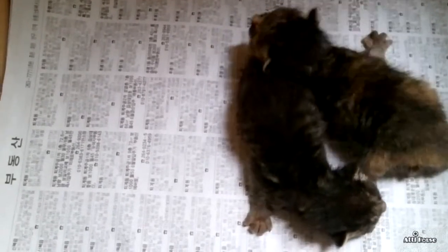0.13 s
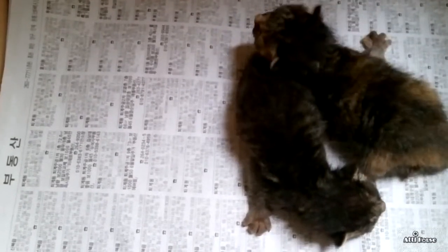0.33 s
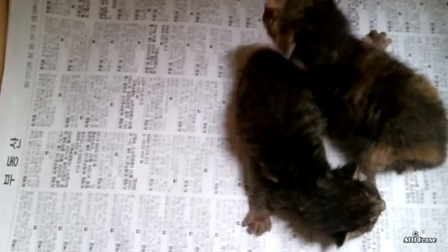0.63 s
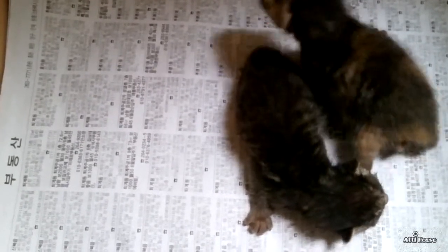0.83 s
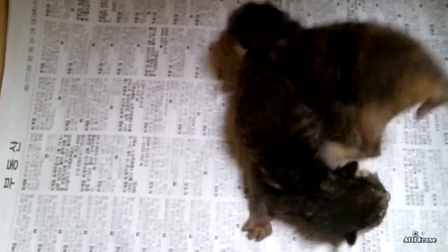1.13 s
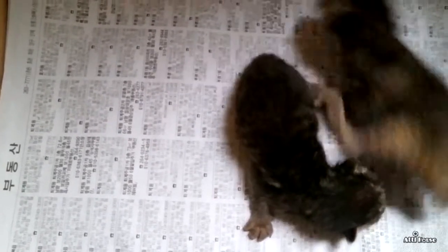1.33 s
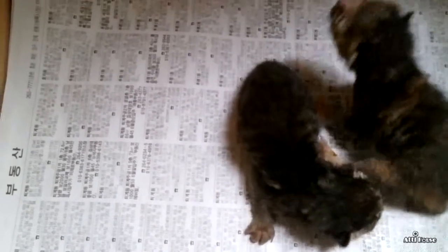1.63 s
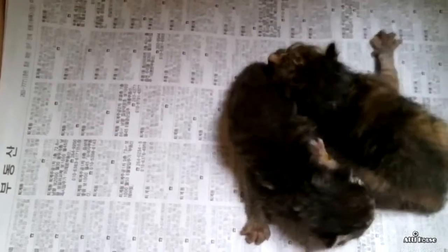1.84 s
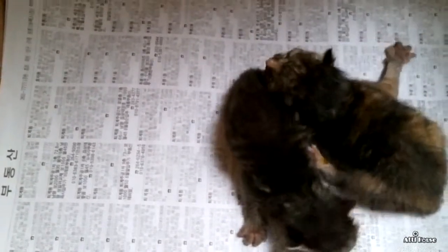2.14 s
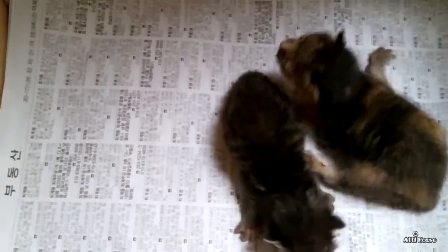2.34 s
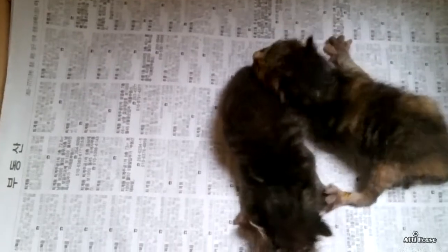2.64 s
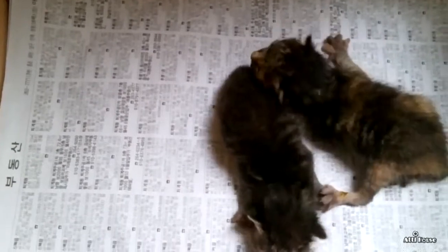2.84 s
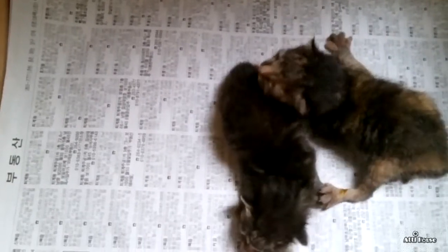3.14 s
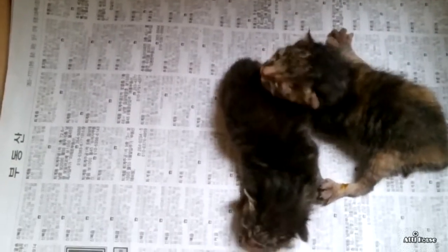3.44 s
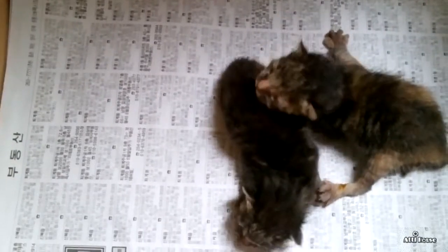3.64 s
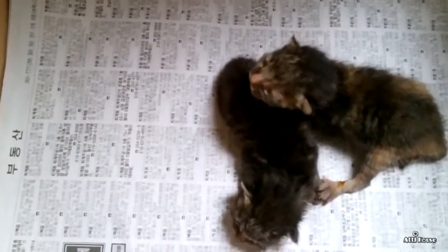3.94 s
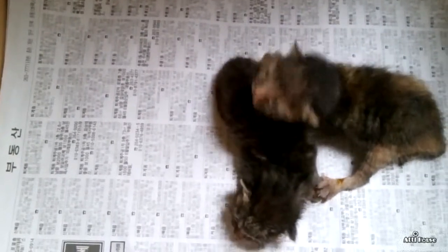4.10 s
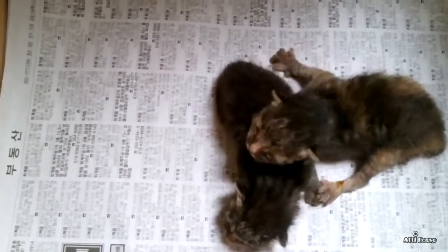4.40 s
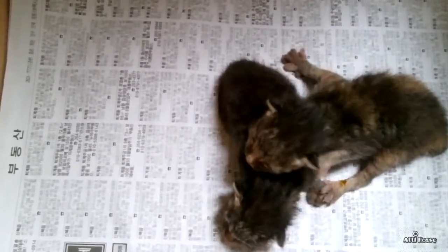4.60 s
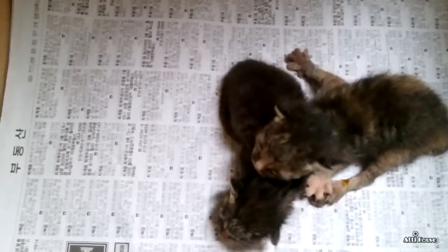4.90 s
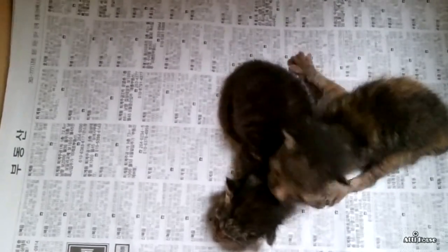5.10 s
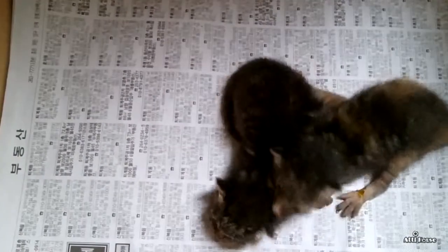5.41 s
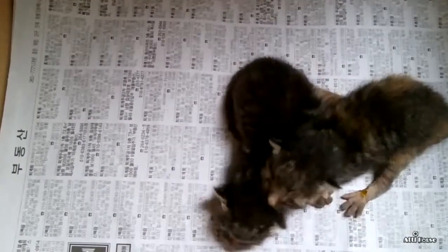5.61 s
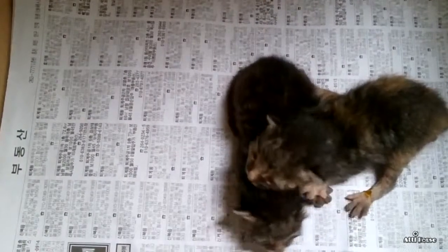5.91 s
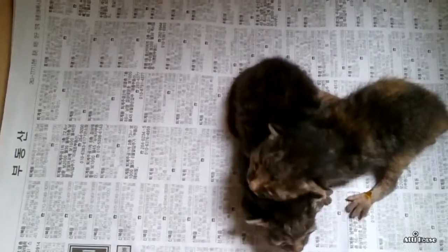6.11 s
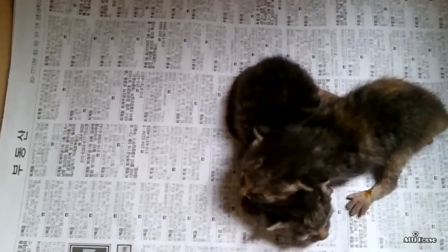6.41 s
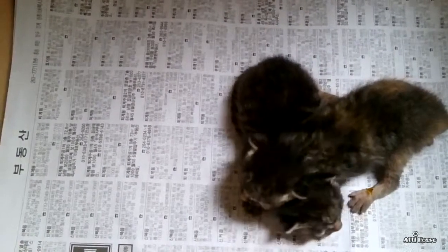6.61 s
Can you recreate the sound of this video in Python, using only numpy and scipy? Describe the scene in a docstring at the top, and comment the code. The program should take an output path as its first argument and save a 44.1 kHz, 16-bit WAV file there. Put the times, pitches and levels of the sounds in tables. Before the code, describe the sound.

Close, shrill kitten mews arch up and down, the loudest slightly distorted, with softer sibling cries, light paper pats and constant background hiss.

```python
"""A steady hiss, and almost at once a loud arching mew: a newborn kitten crawling on newspaper in a
small room, close to the microphone. It cries five times; a quieter littermate starts just ahead of two.
Each mew is a stack of gliding harmonics, shaped by a throat and a moving mouth, with air and roughness.
Paws pat and scuff the paper as short bursts of coloured noise. Short echoes and a tail make the room,
filtered noise makes the hiss and rumble, and the loudest cries overload the recorder."""
import sys
import numpy as np
from scipy import signal
from scipy.fft import rfft, irfft, next_fast_len
from scipy.io import wavfile
from scipy.ndimage import map_coordinates

SR = 44100
rng = np.random.default_rng(int(sys.argv[2]) if len(sys.argv) > 2 else 0)


def unload_wav(signal):
    """Save mono or channel-first audio to the path in sys.argv[1] as 16-bit WAV at rate SR, clipped to [-1, 1]."""
    wavfile.write(
        sys.argv[1],
        SR,
        np.round(np.clip(np.atleast_2d(signal).T, -1, 1) * 32767).astype(np.int16),
    )


N = 297675  # length of the scene in samples

# Steady colour of a kitten's voice: (frequency [Hz], relative level [dB])
THROAT_COLOUR = [(600.0, -31), (1200.0, -17), (1800.0, -5.5), (2400.0, -5.5), (3200.0, 0), (4200.0, -2),
                 (5200.0, -1.5), (5900.0, -7), (6600.0, -3.5), (7300.0, 0.5), (8300.0, -5.5), (9400.0, -14),
                 (10500.0, -22)]
# The arch of each cry, one list a cry, before its kitten's gain: (time [s], pitch [Hz], level [dB])
LOUD_ARCHES = [
    [(0.195, 712, -42), (0.228, 990, -19.5), (0.26, 1182, -13), (0.3, 1358, -11), (0.36, 1457, -11.5),
     (0.42, 1437, -11.5), (0.47, 1414, -14), (0.53, 1273, -13.5), (0.585, 1074, -16.5), (0.655, 657, -36.5)],
    [(1.23, 706.4, -38.5), (1.28, 1030, -15.5), (1.32, 1121, -7.5), (1.37, 1230, -8), (1.42, 1187, -11.2),
     (1.46, 1171, -5), (1.505, 1159, -10.5), (1.55, 1088, -18.5), (1.595, 935, -20), (1.665, 591, -32)],
    [(2.625, 719, -43), (2.675, 1004, -19), (2.73, 1230, -9.5), (2.785, 1387, -8), (2.85, 1358, -4.5),
     (2.9, 1275, -12.3), (2.955, 1108, -13.5), (3.005, 906, -18), (3.055, 668, -33.7)],
    [(3.9, 793.4, -29), (3.955, 1096, -11.5), (4.005, 1285, -10.5), (4.06, 1353, -9.5), (4.12, 1323, -9.5),
     (4.175, 1264, -9.5), (4.225, 1137, -16.5), (4.27, 906, -16.5), (4.335, 646, -37.5)],
    [(5.78, 712, -51), (5.825, 885, -28.5), (5.865, 979, -15.5), (5.91, 1113, -9), (5.96, 1156, -17.5),
     (6.005, 1184, -15.5), (6.05, 1117, -9.5), (6.11, 1018, -16.5), (6.165, 817, -20.1),
     (6.235, 630, -38.5)],
]
SOFT_ARCHES = [
    [(1.08, 628, -36), (1.115, 688, -26), (1.15, 821, -32.5), (1.187, 942, -20.5), (1.25, 1004, -14.5),
     (1.31, 980, -17), (1.37, 832, -25.5), (1.44, 594, -30)],
    [(3.755, 653, -43), (3.79, 927, -24.5), (3.83, 1063, -20), (3.9, 1221, -11.5), (3.95, 1202, -13.5),
     (4.005, 1188, -18.5), (4.06, 1068, -14), (4.13, 782, -27)],
]
# How each cry is mouthed: (mouth open by [share of the cry], resonance at the start [Hz],
# at the end [Hz], resonance height [dB], brightness with the mouth open [dB per octave],
# hoarseness [dB], detour of the bounce off the floor [m], off a nearby wall [m])
LOUD_MOUTHS = [(0.18, 6730, 3640, 11.5, -1.5, -14, 0.201, .848),
               (0.15, 5800, 3500, 18, -4.5, -16, 0.373, .744),
               (0.23, 5620, 3550, 20, -2.5, -27, 0.2976, 0.416),
               (0.17, 4860, 3730, 24.5, -1, -9, 0.3056, .556),
               (0.23, 4540, 3230, 25, -6.5, -14, 0.1376, 0.541)]
SOFT_MOUTHS = [(0.29, 2730, 2470, 23, -7.5, -30, 0.19, 0.572), (.19, 2620, 3390, 24.7, -3, -30, 0.359, 1.2)]
# The voice holds back (the first time it swells instead), then catches abruptly:
# (time of the catch [s], level change just before it [dB], time constant of the build-up [s])
CATCHES = [(1.179, 3, .014), (2.667, -5, 0.018), (3.83, -4, .015), (3.89, -12, 0.024)]
# The littermate wheezes around the start of its voice: (centre [s], level [dB], bell width [s])
WHEEZES = [(1.073, -34.5, .028), (3.755, -31.5, 0.018)]
# Paws patting the paper: (time [s], strength before later gains [dB], pitch [Hz])
PATS = [(0.732, -44, 1820), (0.809, -16, 1478), (0.937, -18.5, 2450), (1.498, -12, 2160),
        (1.77, -16.5, 1820), (2.066, -19.5, 2420)]
# Claws and fur scuffing the paper: (centre [s], level before the paw gain [dB], bell width [s])
SCUFFS = [(0.885, -34.5, 0.01), (2.092, -39.5, 0.038), (2.59, -37.5, 0.21), (4.772, -36, 0.0058),
          (6.695, -35, 0.0088)]
# Colour of the scuffed paper: (frequency [Hz], relative level [dB])
PAPER_COLOUR = [(300, -19), (1200, -6), (3800, -4), (7500, -5.5), (10000, -23)]
# Separate echoes off the walls: (delay [s], level [dB])
WALL_ECHOES = [(.0087, -11.5), (.0137, -22), (0.02, -26.5), (.029, -17)]
# How long the room's tail takes to fall by 60 dB: (frequency [Hz], time [s])
ROOM_DECAY = [(300, 1), (3500, 0.51), (10000, 0.33)]
# Colour of the background hiss and rumble: (frequency [Hz], relative level [dB])
BACKGROUND_COLOUR = [(13, -50), (22, 2), (45, 0), (110, -13.5), (139, -6.5), (166, -6), (232, -6),
                     (368, -14.5), (568, -15), (734, -7), (973, -9.5), (2260, -4), (6310, -10),
                     (8150, -10.5), (10000, -19.5), (13000, -65), (22000, -120)]
# Faint hum: (frequency [Hz], peak level before wavering [dB])
HUM_TONES = [(145.3, -55)]

SHUT_OCTAVES = 0.51  # the resonance starts this much lower and rises as the mouth opens
CLOSE_FROM = 0.56  # share of a cry after which the mouth closes
NASAL_DB = 4  # a shut mouth lifts the first harmonic by this much, higher ones by less
WIDE_DAMPING = 0.18  # how strongly a wide mouth flattens its resonance (0 = not at all)
WANDER_DB = 1.5  # the harmonics trade strength as the head moves
STRAIN_AT, STRAIN_SPREAD = 0.25, 0.1  # where the rising voice is hoarsest, how widely [shares of a cry]
BOUNCE_DB = -11.5  # each short echo against the direct voice
WHEEZE_HZ, WHEEZE_WIDTH_HZ = 2020, 540
HISS_HZ = 10050  # top of the background
MIC_HZ, TOP_HZ = 10700, 15700  # roll-offs ahead of and after the converter
CONVERTER_HZ = 32000  # sampling rate of the converter


def kittens():
    """The loud kitten opens its mouth gradually; its littermate has a cleaner voice and snaps it open."""
    out = wheezes()
    for arch, mouthing in zip(LOUD_ARCHES, LOUD_MOUTHS):
        cry = mew(arch, mouthing, open_s=0.068, dull_db=6.5, mouth_octaves=0.35, jitter=0.008,
                  rasp=0.019, flutter_db=5.0, air_db=-30.5, rattle_db=-25)
        add(out, arch[0][0], amp(1.42) * cry)
    for arch, mouthing in zip(SOFT_ARCHES, SOFT_MOUTHS):
        cry = mew(arch, mouthing, open_s=0.012, dull_db=6, mouth_octaves=0.35, jitter=0.0031,
                  rasp=0.012, flutter_db=4.0, air_db=-28, rattle_db=-23)
        add(out, arch[0][0], amp(1) * cry)
    return out


def mew(arch, mouthing, open_s, dull_db, mouth_octaves, jitter, rasp, flutter_db, air_db, rattle_db,
        count=13):
    """Harmonics of the vocal folds, shaped by the throat and by a mouth that opens and closes."""
    s, pitch, level = np.transpose(arch)
    open_by, start_hz, end_hz, mouth_db, bright_db, hoarse_db, *detours_m = mouthing
    t = np.arange(s[0], s[-1], 1 / SR)
    size = len(t)

    # The mouth opens quickly and closes slowly: the voice is duller whenever it is shut.
    progress = np.linspace(0, 1, size)
    shut_at_start = np.clip((open_by - progress) * (s[-1] - s[0]) / open_s, 0, 1)
    shut_at_end = np.clip((progress - CLOSE_FROM) / (1 - CLOSE_FROM), 0, 1)
    shut = shut_at_start + shut_at_end
    mouth_hz = start_hz * (end_hz / start_hz) ** progress * 2 ** (-SHUT_OCTAVES * shut_at_start)
    tilt_db = bright_db - dull_db * shut  # dB per octave

    # The folds are steadiest at the top of the arch and rougher as they tighten and slacken.
    smooth_pitch = glide(t, s, pitch)
    slack = np.clip(0.184 + 3 * (1 - smooth_pitch / pitch.max()), 0, 1)
    f0 = smooth_pitch * (1 + 0.00202 * wobble(61, size) + jitter * slack * wobble(349, size))
    phase = 2 * np.pi * np.cumsum(f0) / SR + rasp * slack * wobble(1500, size)
    height_db = mouth_db * (1 - WIDE_DAMPING * (1 - slack))

    voice, power = np.zeros(size), np.zeros(size)
    for k in range(1, count + 1):
        hz = k * f0
        # An upper resonance sharpens together with the mouth's main one.
        mouth = height_db * (bump(hz, mouth_hz, mouth_octaves) + 0.27 * bump(hz, 8440, 0.049))
        tilt = tilt_db * np.log2(hz / 4000)
        colour = along(THROAT_COLOUR, hz) + mouth + tilt + NASAL_DB * shut / k ** 2
        strength = amp(colour) * bounce(hz, detours_m)
        unsteady_db = flutter_db * slack * wobble(109.77, size) + WANDER_DB * wobble(25.1, size)
        voice += strength * amp(unsteady_db) * np.sin(k * phase + rng.uniform(0, 2 * np.pi))
        power += strength ** 2 / 2

    # Air hisses through the folds once a cycle.
    air = amp(air_db) * (1 + np.cos(phase)) * noise(THROAT_COLOUR, size)
    # Irregular beats of straining or slack folds ring the mouth's resonance.
    strain_shape = np.exp(-0.5 * ((progress - STRAIN_AT) / STRAIN_SPREAD) ** 2)
    strain = amp(hoarse_db) * strain_shape * wobble(1900, size)
    slack_beats = amp(rattle_db) * slack ** 2 * wobble(1100, size)
    rattle = (strain + slack_beats) * np.sin(2 * np.pi * np.cumsum(mouth_hz) / SR)

    fade = np.clip(np.minimum(t - s[0], s[-1] - t) / 0.0025, 0, 1)
    # Dividing by the harmonics' power lets the arch alone set the loudness.
    return amp(np.interp(t, s, level)) * (voice / np.sqrt(power) + air + rattle) * fade


def bounce(hz, detours_m):
    """Echoes off the floor and a nearby wall strengthen or cancel each harmonic as it glides."""
    delays = np.array(detours_m) / 343  # speed of sound [m/s]
    echoes = sum(np.exp(-2j * np.pi * hz * delay) for delay in delays)
    return np.abs(1 + amp(BOUNCE_DB) * echoes)


def wheezes():
    """Air rings the resonance of a nearly shut mouth."""
    ring = filtered(rng.standard_normal(N),
                    lambda hz: 1 / (1 + ((hz - WHEEZE_HZ) / WHEEZE_WIDTH_HZ) ** 2) ** 2)
    return unit(ring) * sum(amp(db) * swell(s, length) for s, db, length in WHEEZES)


def catches():
    """Gain of the voice: it drifts off before each catch and snaps back when the folds close fully."""
    t = np.arange(N) / SR
    change_db = np.zeros(N)
    for s, db, length in CATCHES:
        snap = np.clip((s - t) / 0.002, 0, 1)  # back to normal within 2 ms
        change_db += db * np.exp(-np.abs(s - t) / length) * snap
    return amp(change_db)


def paws():
    """Dull pats and short scuffs on the paper: noise bursts that die away and noise that swells."""
    out, t = np.zeros(N), np.arange(SR // 10) / SR
    for s, db, hz in PATS:
        thud = noise([(60, -9), (hz / 3, -11), (hz, 0), (hz * 1.37, -14), (hz * 5, -32)], len(t))
        touch = 1 - np.exp(-t / 0.00096)  # a soft paw lands gradually
        decay = amp(-60 * t / 0.016) + amp(-13.5 - 60 * t / 0.24)  # a quick drop and a quieter, slower one
        add(out, s, amp(db - 7) * thud * touch * decay)
    stroke = sum(amp(db) * swell(s, length) for s, db, length in SCUFFS)
    crackle = unit(noise(PAPER_COLOUR, N) * amp(4.7 * wobble(300, N)))
    return out + stroke * crackle


def room(x, wet_db):
    """Wall echoes make the gliding harmonics beat; a short diffuse tail follows."""
    hz, _, z = signal.stft(rng.standard_normal(SR // 2), SR, nperseg=256)
    frame_s = _
    fall = amp(-60 * frame_s / along(ROOM_DECAY, hz)[:, None])
    tail = signal.istft(z * fall, SR, nperseg=256)[1]
    response = np.zeros(SR)
    response[0] = 1  # the direct sound
    add(response, 0.012, amp(wet_db) * tail / np.linalg.norm(tail))
    for delay, db in WALL_ECHOES:
        add(response, delay, amp([db]))
    return signal.fftconvolve(x, response)[:N]


def background():
    """Steady hiss and rumble from coloured noise, with a faint hum wavering in level and phase."""
    t = np.arange(N) / SR
    hiss = amp(-36.5 + 0.31 * wobble(3.22, N)) * low_pass(noise(BACKGROUND_COLOUR, N), HISS_HZ, order=60)
    hum = np.zeros(N)
    for hz, db in HUM_TONES:
        hum += amp(db + 1.1 * wobble(13, N)) * np.sin(2 * np.pi * hz * t + wobble(7.0, N))
    return hiss + hum


def amp(db):
    """Decibels to gain."""
    return 10 ** (np.asarray(db) / 20)


def unit(x):
    """Scale to an rms (average strength) of 1."""
    return x / np.sqrt(np.mean(x ** 2) + 1e-20)


def along(points, hz):
    """Read a (frequency [Hz], value) table at hz, on a log frequency axis."""
    f, v = np.transpose(points)
    return np.interp(np.log(hz + 1), np.log(f + 1), v)


def wobble(rate, size):
    """A smooth random curve through rate random points a second."""
    return map_coordinates(rng.standard_normal(int(size * rate / SR) + 4), [np.arange(size) * rate / SR])


def glide(t, s, values):
    """A cubic curve through the points, without corners."""
    slope = np.gradient(values, s)
    i = np.clip(np.searchsorted(s, t) - 1, 0, len(s) - 2)
    step = s[i + 1] - s[i]
    u = (t - s[i]) / step  # 0 to 1 between two points
    rise = values[i + 1] - values[i]
    bend = (1 - u) * (slope[i] * step - rise) - u * (slope[i + 1] * step - rise)
    return values[i] + u * rise + u * (1 - u) * bend


def bump(hz, centre_hz, octaves):
    """The shape of a resonance, 1 at its centre."""
    return 1 / (1 + (np.log2(hz / centre_hz) / octaves) ** 2)


def swell(s, length):
    """A bell-shaped rise and fall around time s."""
    return np.exp(-0.5 * ((np.arange(N) / SR - s) / length) ** 2)


def filtered(x, response):
    """Weaken or strengthen each frequency of x by response(hz)."""
    m = next_fast_len(len(x) + 8192)  # spare room for the filter to ring out
    return irfft(rfft(x, m) * response(np.fft.rfftfreq(m, 1 / SR)), m)[:len(x)]


def low_pass(x, hz, order):
    """A steep roll-off above hz."""
    return filtered(x, lambda f: 1 / np.sqrt(1 + (f / hz) ** (2 * order)))


def noise(spectrum, size):
    """Random noise coloured by a table, with an rms of 1."""
    return unit(filtered(rng.standard_normal(size), lambda hz: amp(along(spectrum, hz))))


def add(track, s, sound):
    """Mix a sound into the track at time s."""
    part = track[max(round(s * SR), 0):][:len(sound)]
    part += sound[:len(part)]


def scene():
    """Kittens and paws in the room, over the background."""
    voices = kittens() * catches()
    return (room(voices + amp(1.0) * paws(), wet_db=-16.0) + background())[None]


def record(dry):
    """A band-limited microphone feeds a converter that clips on the loudest cries."""
    mic = low_pass(dry[0], MIC_HZ, order=50)
    sampled = signal.resample_poly(mic, CONVERTER_HZ, SR)
    clipped = signal.resample_poly(np.clip(sampled, -1, 1), SR, CONVERTER_HZ)[:N]
    return low_pass(clipped, TOP_HZ, order=80)[None]


dry = scene()
out = record(dry)
unload_wav(out)
```